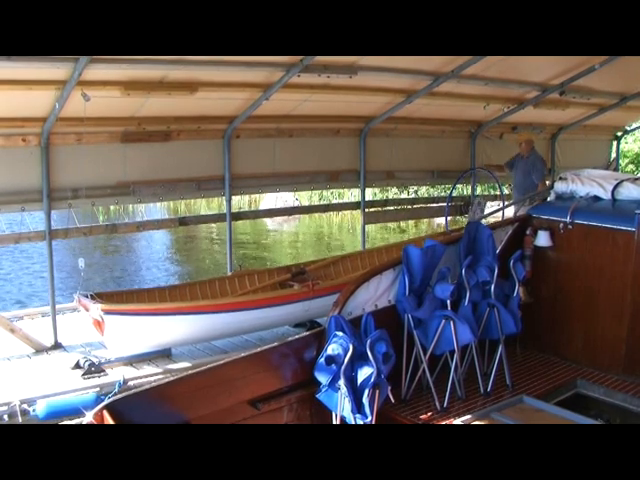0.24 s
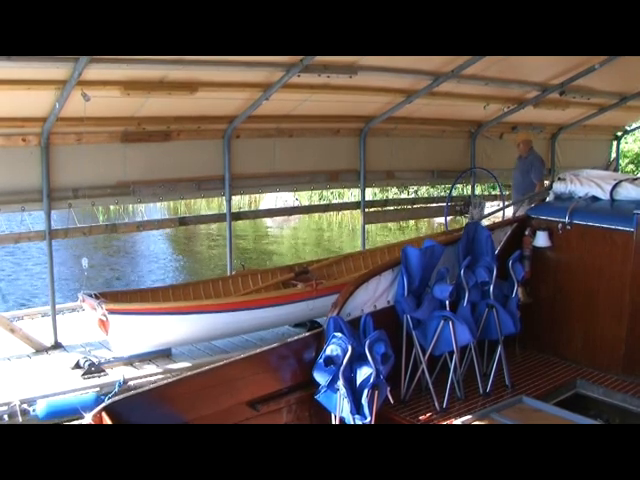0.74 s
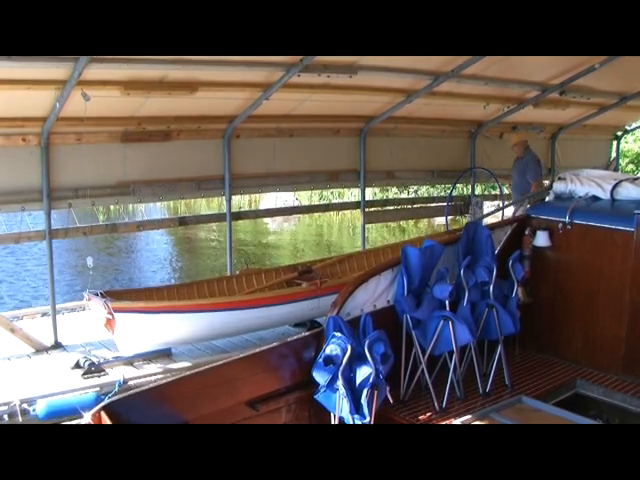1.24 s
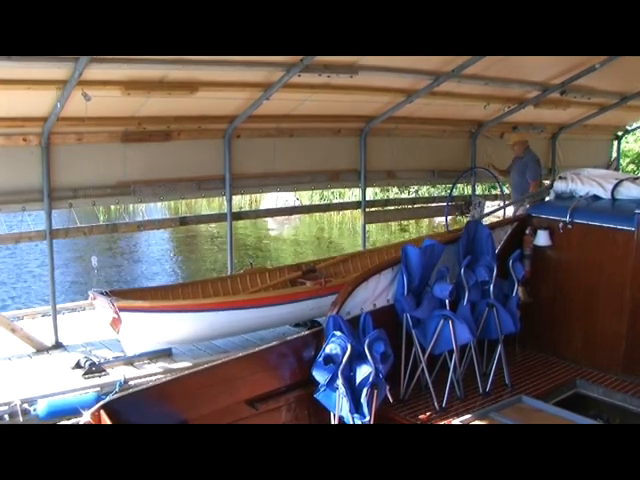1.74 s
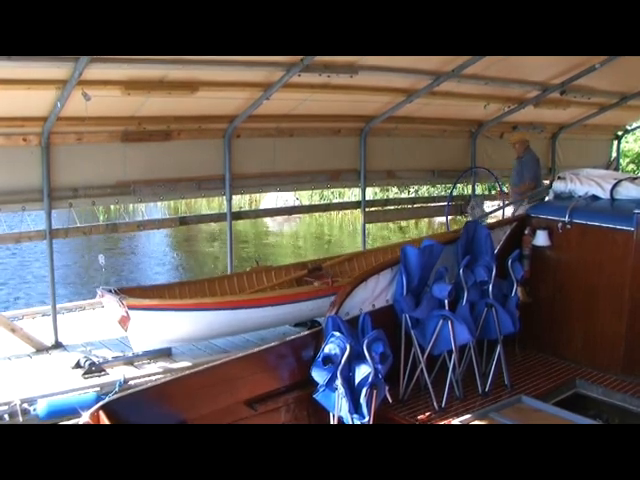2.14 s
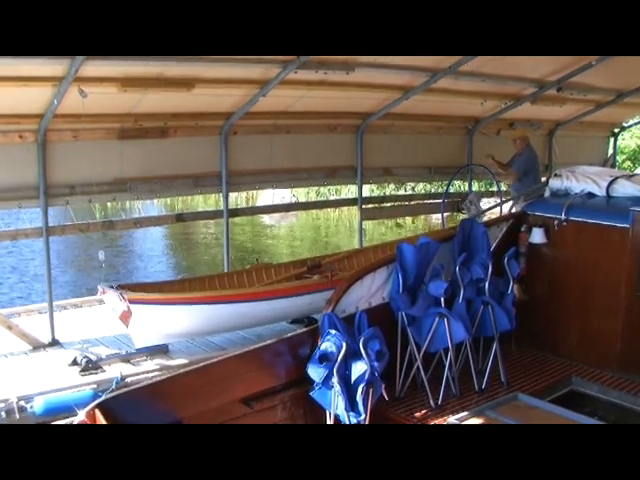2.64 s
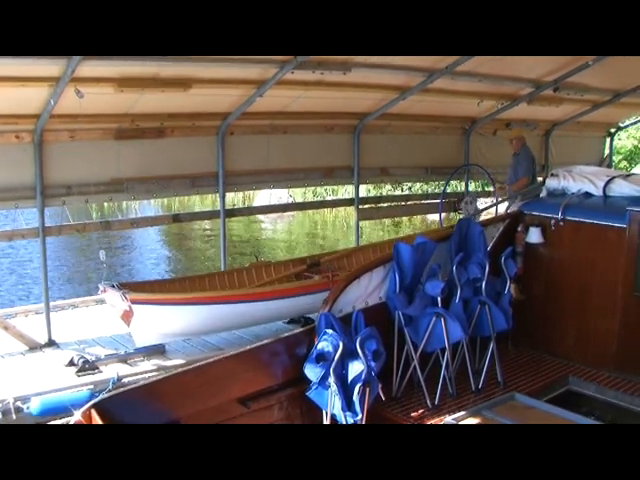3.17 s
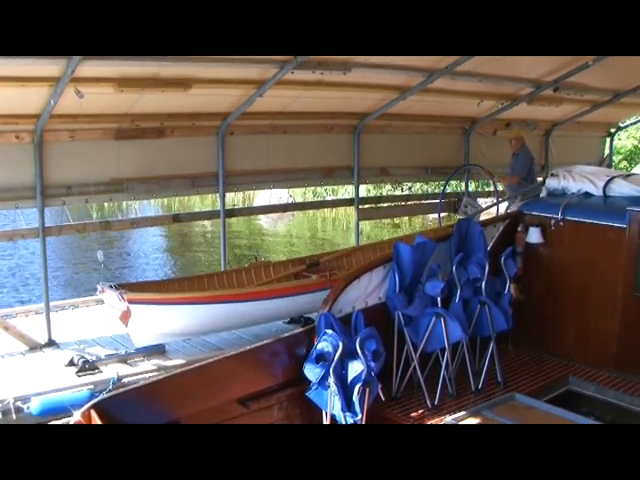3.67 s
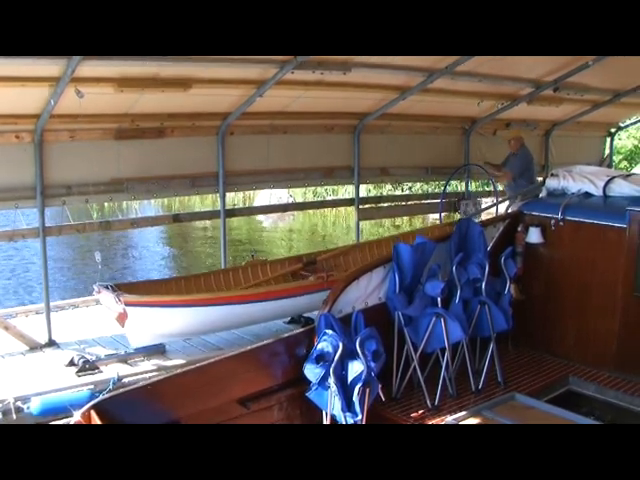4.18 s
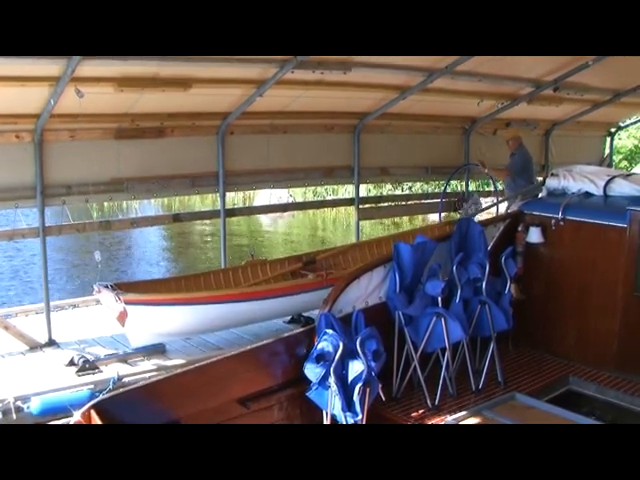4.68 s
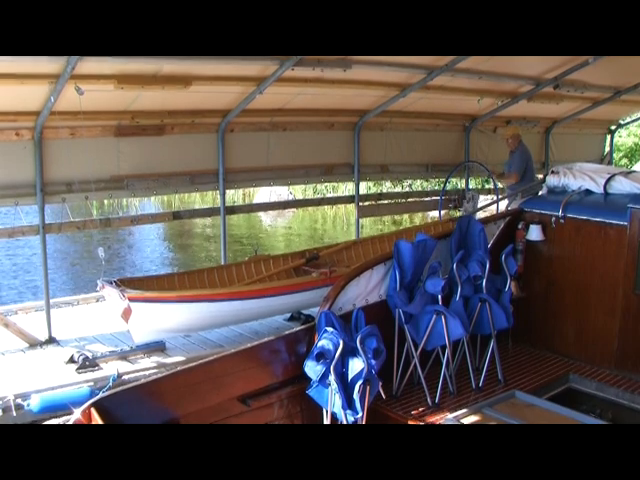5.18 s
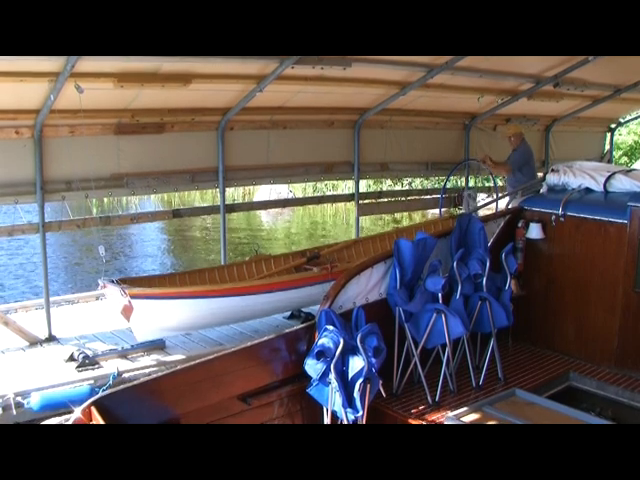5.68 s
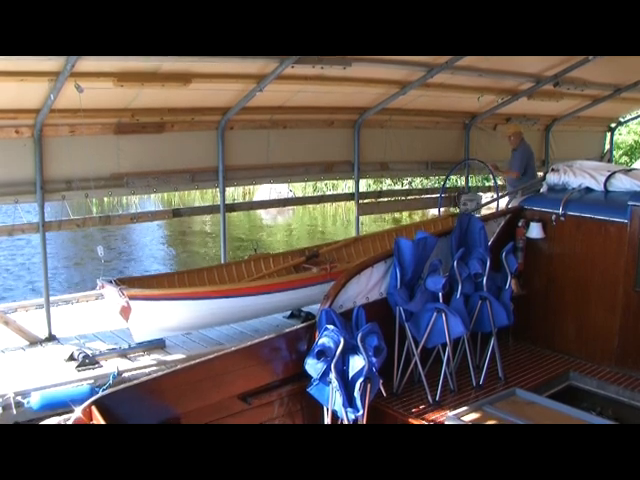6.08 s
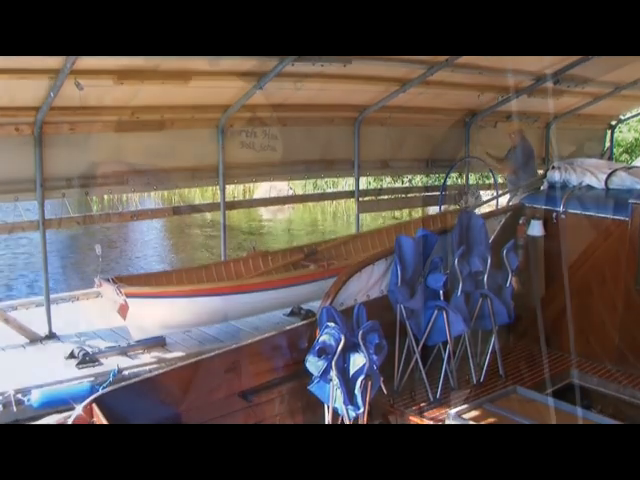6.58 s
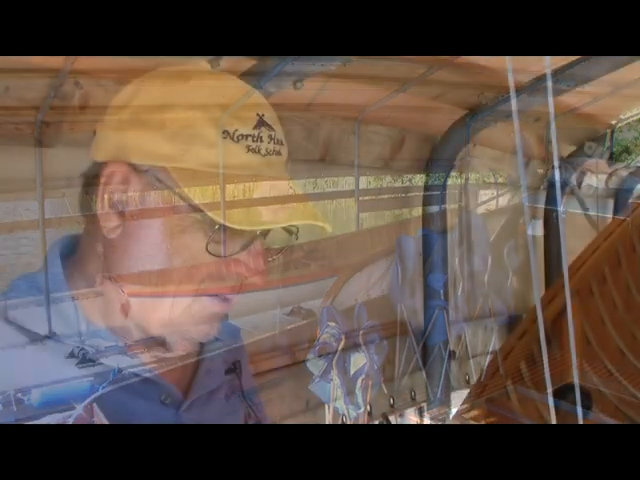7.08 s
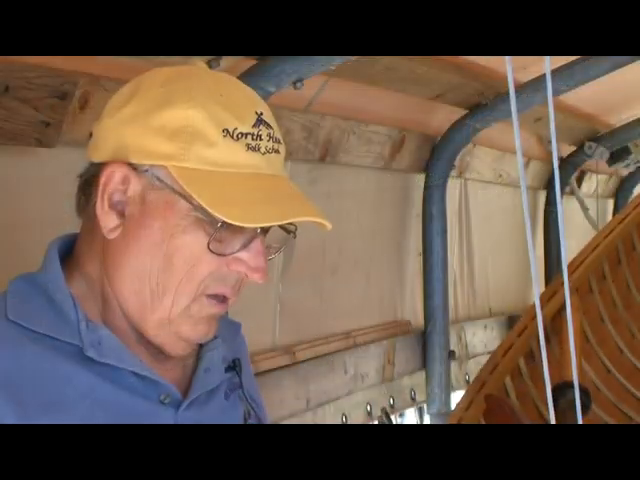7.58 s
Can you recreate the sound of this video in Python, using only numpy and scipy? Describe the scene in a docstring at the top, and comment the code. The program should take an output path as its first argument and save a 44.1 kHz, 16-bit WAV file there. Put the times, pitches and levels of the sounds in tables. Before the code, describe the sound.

A canvas-roofed boathouse by the water, with quiet open air, hollow dock slaps and a faint, wavering low motor far off. A ratchet winch stands a few metres away, slightly right. Steel pawl clanks sound at the very start and 0.05 s, then soft gear knocks around 0.7-1.35, with clustered water slaps from 0.4 to 1.45. A lone full clank rings at 1.5, followed by more knocks until 2.0. From 2.15 to 6.4 the wheel cranks steadily, spaced more widely around 3 s, then quickening to about ten clacks a second: tiny scrape, bright crack with a bounce, short clatter and metallic ring, each differing in pitch and force, softer in places. After it stops, gear knocks fall between 6.6 and 7.5; dry close ticks come at 6.95 and 7.55. The motor sinks, swells near 7.25 and fades. A soft rushing noise enters at 7.6 and continues to the end.

```python
"""In a canvas-roofed boathouse, a few metres from a boat lift, water laps at the dock and a distant motor hums unsteadily.
The big hand wheel starts with single drops of its steel pawl, and the gears knock softly in between.
Then a steady run: the pawl scrapes over each ratchet tooth and drops, ringing wheel and frame.
After the run come more gear knocks and two dry ticks close by; the motor sinks, swells briefly and sinks again.
Last a soft rushing noise joins the open air. Noise is coloured and shaped; the wheel is a bank of decaying modes."""
import sys
import numpy as np
from scipy import signal
from scipy.fft import rfft, irfft
from scipy.io import wavfile
from scipy.ndimage import uniform_filter1d

SR = 44100
rng = np.random.default_rng(int(sys.argv[2]) if len(sys.argv) > 2 else 0)


def unload_audio(sound):
    """Save the sound as a 16-bit wav file, at the path given as the first command line argument."""
    columns = np.transpose(np.atleast_2d(sound))
    # keep every value between -1 and 1, then stretch to whole-number steps
    steps = np.round(np.clip(columns, -1, 1) * 32767)
    wavfile.write(sys.argv[1], SR, steps.astype(np.int16))


N = 344862

# Stereo width of all noise and of the wheel. Each row: frequency in Hz, side relative to mid in dB.
STEREO_WIDTH = [(25, -12), (70, -2.5), (200, -7.5), (1000, -10.5), (2200, -11.5), (4500, -7), (9000, -4),
                (13000, -4)]
# Decay of the dense clatter under the roof. Each row: frequency in Hz, time to fall by 60 dB in seconds.
ROOF_DECAY = [(300, 0.28), (1000, 0.48), (2200, 0.36), (4000, 0.34), (6500, 0.25), (9000, 0.27),
              (14000, 0.16)]

# Open air outside, as heard over time. Each row: time in seconds, level in dB before the wandering.
AIR_LEVEL = [(0, -47.5), (.5, -48.5), (.8, -47.5), (2.2, -44.5), (4.2, -49.5), (4.8, -44.5), (5.4, -48),
             (6, -50.5), (6.6, -48.5), (7.3, -46), (7.6, -48.5), (7.82, -49.5)]
# Colour of the open air. Each row: frequency in Hz, relative level in dB.
AIR_SPECTRUM = [(15, -45), (25, -9.5), (116, -0.5), (309, 2), (372, -6), (436, 2), (525, -3.5), (632, 0.5),
                (1820, -8.5), (2380, -11), (3260, -16), (11600, -29), (12900, -48.5), (14000, -86.5)]
# Colour of the late rushing noise. Each row: frequency in Hz, relative level in dB.
RUSH_SPECTRUM = [(30, -10), (60, 0), (170, 3.5), (400, 1.5), (900, -5), (2000, -5.5), (3500, -13),
                 (4700, -11), (5600, -21), (12000, -25), (14000, -52)]

# Motor far across the water. Each row: time in seconds, level in dB before the flutter.
MOTOR_LEVEL = [(0.0, -54.5), (0.68, -49.5), (1.59, -54.5), (1.97, -49), (3.75, -57.5), (3.82, -52.5),
               (4.7, -59), (4.93, -54.5), (5.55, -64), (6.73, -69), (7.25, -57), (7.7, -64)]
MOTOR_HZ = 110.4

# Water slapping the dock. Each row: start in seconds, pitch in Hz, level in dB before the swell shapes it.
DOCK_SLAPS = [(.36, 620, -46.5), (0.612, 680, -44.5), (0.699, 605, -44), (.88, 650, -42), (.98, 544, -45),
              (1.09, 600, -44), (1.19, 630, -47), (1.449, 690, -46), (2.925, 280, -40), (7.342, 428, -47),
              (7.50, 950, -43.5)]

# Small dry ticks close by. Each row: start in seconds, level in dB before the decay.
DRY_TICKS = [(6.944, -39.5), (7.545, -33.5)]
# Colour of a tick. Each row: frequency in Hz, relative level in dB.
TICK_SPECTRUM = [(300, -14), (1500, 9), (3500, -2.5), (6000, -12.5), (12000, -30)]

# Soft gear knocks. Each row: start in seconds, level in dB relative to the other knocks.
GEAR_KNOCKS = [(0.6745, -32.5), (0.7735, -27), (0.971, -36), (1.1594, -39), (1.347, -40), (1.8112, -33.5),
               (1.8723, -35.5), (2.0066, -34), (6.6245, -37.5), (6.7335, -31.5), (7.1137, -31),
               (7.2581, -33.5), (7.367, -32), (7.5093, -41)]
# Colour of a knock. Each row: frequency in Hz, relative level in dB.
KNOCK_SPECTRUM = [(300, -0.5), (900, -2.5), (1600, -14.5), (2400, -8), (3000, -14.5), (3900, -9.5),
                  (4600, -14.5), (7000, -15), (9000, -27), (14000, -38)]
# Resonances of the gear housing. Each row: centre in Hz, width in Hz, peak height in dB.
HOUSING_PEAKS = [(1050, 33, 14.5), (1432, 53, 17), (1976, 50, 15.5), (2325, 100, 11.5), (2644, 38, 14),
                 (2926, 280, 12), (3630, 260, 10.5)]
KNOCK_HZ, KNOCK_SCATTER = 2480, 0.21  # mean pitch that a knock favours; its random spread as a share

# Pawl drops, the first just before the scene opens.
# Each row: start in seconds, level in dB relative to the other drops, pitch this tooth favours in Hz.
PAWL_DROPS = [(-.046, -6, 1030), (0.0522, -5, 2330), (1.5077, -5, 1290), (2.139, -5, 1100),
              (2.2372, -5, 1110), (2.3907, -4, 1330), (2.4927, -5.5, 2320), (2.6124, -9, 1520),
              (2.8064, -4.5, 2020), (2.982, -5, 2067), (3.1604, -5, 5770), (3.2956, -4.5, 2320),
              (3.4151, -6.5, 2025), (3.527, -7, 1656), (3.6262, -13, 2320), (3.8082, -14, 1012),
              (3.8742, -4, 894), (3.948, -4.5, 6700), (4.043, -6.5, 6480), (4.1522, -6, 2120),
              (4.2506, -6.5, 4270), (4.362, -8.5, 2274), (4.4788, -8.5, 2260), (4.574, -9.5, 2500),
              (4.6456, -6, 1274), (4.7159, -6.5, 1490), (4.8024, -11, 1263), (4.9108, -12.5, 1065),
              (5.029, -6, 997), (5.1249, -5, 2025), (5.245, -5, 2930), (5.3536, -4.5, 5400),
              (5.4461, -4.5, 2560), (5.5245, -7, 1117), (5.6077, -7.5, 1120), (5.6939, -9, 1122),
              (5.7836, -7, 1410), (5.8817, -7, 2115), (5.9776, -13, 1160), (6.0872, -10, 2076),
              (6.214, -15.5, 1109), (6.2844, -8.5, 1620), (6.384, -6, 3780)]
# Colour of the steel clank. Each row: frequency in Hz, relative level in dB.
CLANK_SPECTRUM = [(150, -48.5), (250, -37.5), (292, -15.5), (569, -18.5), (620, -12), (801, -12),
                  (1110, -8.5), (1820, -5.5), (2240, -1), (3270, -4), (3680, 0), (6590, 1.5), (8520, -10.5),
                  (11400, -6.5), (15000, -34.5)]
# Modes of wheel and frame. Each row: frequency in Hz, relative level in dB, time to fall by 60 dB in seconds.
WHEEL_MODES = [(630, -15, .7), (893, -12, .57), (996, -5, .52), (1098, -6, .65), (1222, -9, .59),
               (1266, -10, .9), (1325, -11, .9), (1440, -13, .8), (1620, -6, .42), (1798, -9, .7),
               (2023, -3, .62), (2102, -6, .55), (2160, -5, .62), (2320, -4, .72), (2509, -6, .39),
               (2595, -7, .72), (2756, -8, .6), (3106, -10, .8), (3429, -7, .62), (3650, -4, .38),
               (3801, -4, .33), (4221, -5, .38), (4768, -3, .33), (4890, -13, .62), (5297, -5, .38),
               (5770, -3, .31), (5920, -14, .55), (6467, -1, .34), (6655, -3, .3), (7075, -11, .42)]
# How well the spokes radiate. Each row: frequency in Hz, gain in dB.
SPOKE_RADIATION = [(700, -25), (1200, -29.5), (2300, -25), (4000, -20.5), (6500, -17.5)]
# How far a favoured wheel mode can stand out. Each row: frequency in Hz, boost in dB at a share of 1.
MODE_BOOST = [(1200, 11.5), (2400, 7), (5000, 3.5)]
# Groups of wheel modes; a drop favours one of each by chance. Each row: lowest Hz, highest Hz.
CHANCE_GROUPS = [(1950, 2900), (3300, 6900)]
OWN_SHARE, CHANCE_SHARE = 1.33, 0.45  # pull of the tooth's own pitch, and of the modes picked by chance

USUAL_DB = -6.5  # drop level in steady cranking
TOOTH_S, REST_S = 0.098, 1.0  # wait between drops in steady cranking; wait that counts as a full stop
SOFT_CLANG, SOFT_RING, SOFT_WHEEL = 0.72, 0.46, 0.2  # dB each part keeps per dB that a drop is softer
REST_CLANG_DB, REST_SIZZLE_DB, REST_WHEEL_DB = 1.5, 0.8, 0.5  # added per factor of e in the wait
WHEEL_DB, SIZZLE_DB = -1, 4.5  # for a drop of usual level in steady cranking
DAMP_DB = -2.5  # each new drop checks the ringing left by the ones before

TOP_HZ = 15000


def undb(db):
    """Decibels to gain."""
    return 10 ** (np.asarray(db) / 20)


def unit(x):
    """Scale to rms 1."""
    return x / np.sqrt(np.mean(x ** 2))


def read(points, hz):
    """Read (Hz, value) points on a log-frequency axis."""
    f, value = np.transpose(points)
    return np.interp(np.log(np.maximum(hz, 1)), np.log(f), value)


def curve(points):
    """Read (s, value) points at every sample."""
    return np.interp(np.arange(N) / SR, *np.transpose(points))


def bins(size):
    """Frequencies of a spectrum of this many samples."""
    return np.arange(size // 2 + 1) * SR / size


def colour(x, points):
    """Give a sound the spectrum of (Hz, dB) points."""
    size = x.shape[-1]
    return irfft(rfft(x) * undb(read(points, bins(size))), size)


def noise(size):
    """White stereo noise whose likeness left and right depends on frequency."""
    mid, side = rng.standard_normal((2, size))
    side = colour(side, STEREO_WIDTH)
    return np.array([mid + side, mid - side])


def walk(rate):
    """Smooth random wander with an rms of 1, from this many fresh values a second."""
    k = int(SR / rate)
    steps = np.repeat(rng.standard_normal(N // k + 1), k)
    smooth = uniform_filter1d(uniform_filter1d(steps, k), k)
    return unit(smooth[:N])


def add(out, s, sound):
    """Mix a sound in at a time, cutting what lies outside the scene."""
    start = int(round(s * SR))
    a, b = max(start, 0), min(start + sound.shape[-1], N)
    if b > a:
        out[:, a:b] += sound[:, a - start:b - start]


def swell(t, peak_s):
    """An envelope that rises from time 0 to 1 at its peak and dies away."""
    u = np.maximum(t, 0) / peak_s
    return u * np.exp(1 - u)


def bump(hz, centre_hz, width_hz):
    """A resonance peak of height 1."""
    return 1 / (1 + (2 * (hz - centre_hz) / width_hz) ** 2)


def patches(hz, width_hz=110, patchy_db=4):
    """Random clusters of the many small modes of a bolted frame, in dB."""
    count = int(SR / width_hz) + 2
    return patchy_db * np.interp(hz / width_hz, np.arange(count), rng.standard_normal(count))


def die_away(x):
    """Dense reflections under the roof: each band of a sound fades at its own rate."""
    size = x.shape[-1]
    hz, t60 = np.transpose(ROOF_DECAY)
    spectrum, t = rfft(x), np.arange(size) / SR
    out = 0
    # overlapping bands that add up to the whole sound
    for row, life in zip(np.eye(len(hz)), t60):
        share = read(np.c_[hz, row], bins(size))
        out = out + irfft(spectrum * share, size) * np.exp(-np.log(1000) * t / life)
    return out


def air(rush_db=-44.0, rush_s=7.62, rush_rise_s=0.018, lumpy_db=2.5):
    """Outdoor wash whose lows and highs wander apart; a soft rushing noise with lumpy lows joins at the end."""
    wash = unit(colour(noise(N), AIR_SPECTRUM))
    low = colour(wash, [(400, 8), (1200, -13)])
    wash = low * undb(.8 * walk(18)) + (wash - low) * undb(.5 * walk(7))
    rush = unit(colour(noise(N), RUSH_SPECTRUM))
    rush_low = colour(rush, [(400, 0), (2500, -10), (6000, -25)])
    rush = rush + rush_low * (undb(lumpy_db * walk(45)) - 1)
    rush = rush * np.clip((np.arange(N) / SR - rush_s) / rush_rise_s, 0, 1)
    left_right = undb([[.7], [-.7]])  # slightly stronger on the left
    return (wash * undb(curve(AIR_LEVEL)) + undb(rush_db) * rush) * left_right


def motor(waver=0.0059, flutter_db=0.8):
    """A low drone from across the water: one sine tone, slightly unsteady in pitch and level."""
    hz = MOTOR_HZ * (1 + waver * walk(4))
    hum = np.sqrt(2) * np.sin(2 * np.pi * np.cumsum(hz) / SR)  # rms 1
    level_db = curve(MOTOR_LEVEL) + flutter_db * walk(7.4)
    return hum * undb(level_db) * undb([[1], [-1]])  # slightly stronger on the left


def water(size=16384, swell_s=0.011, ripple_db=-56, count=24):
    """Hollow slaps under the dock: swelling noise around a pitch, with smaller ripples scattered throughout."""
    out, t = np.zeros((2, N)), np.arange(size) / SR
    # ripples at random times, from 300 to 900 Hz, up to 4 dB above the weakest
    ripples = [(u * N / SR, 300 * 3 ** v, ripple_db + 4 * w) for u, v, w in rng.random((count, 3))]
    for s, hz, db in DOCK_SLAPS + ripples:
        hollow = [(hz / 2, -20), (hz, 0), (hz * 2, -17), (hz * 10, -72)]
        slap = unit(colour(noise(size), hollow)) * swell(t, swell_s)
        add(out, s, undb(db) * slap)
    return out


def ticks(size=2048, decay_s=0.0033):
    """Tiny clicks close by: short bursts of noise that die at once, with no ring."""
    out, t = np.zeros((2, N)), np.arange(size) / SR
    for s, db in DRY_TICKS:
        tick = unit(colour(noise(size), TICK_SPECTRUM)) * np.exp(-t / decay_s)
        add(out, s, undb(db) * tick)
    return out


def gears(size=16384, knock_db=-11, rise_s=0.00038, contact_db=5, contact_s=0.067, favour_db=6, width_hz=700):
    """Knocks of the gear teeth taking up the load, heard through the resonances of their housing."""
    out, t, hz = np.zeros((2, N)), np.arange(size) / SR, bins(size)
    housing_db = sum(db * bump(hz, centre, width) for centre, width, db in HOUSING_PEAKS)
    # the contact itself stands out above the tail under the roof
    shape = np.clip(t / rise_s, 0, 1) * undb(contact_db * np.exp(-t / contact_s))
    for s, db in GEAR_KNOCKS:
        favoured_hz = KNOCK_HZ * (1 + KNOCK_SCATTER * rng.standard_normal())
        gain = undb(housing_db + favour_db * bump(hz, favoured_hz, width_hz) + patches(hz))
        burst = irfft(gain * rfft(noise(size)))
        knock = die_away(unit(colour(burst, KNOCK_SPECTRUM)))
        add(out, s, undb(db + knock_db) * knock * shape)
    return out


def drop_tint(db, wait_s):
    """Clang, ring, sizzle and wheel level of a drop in dB: a soft drop is duller, one after a pause is fuller."""
    soft = USUAL_DB - db
    rest = np.log(min(wait_s, REST_S) / TOOTH_S)
    clang = SOFT_CLANG * soft + REST_CLANG_DB * rest
    ring = SOFT_RING * soft
    sizzle = SIZZLE_DB + REST_SIZZLE_DB * rest
    wheel_db = WHEEL_DB + SOFT_WHEEL * soft + REST_WHEEL_DB * rest
    return (clang, ring, sizzle), wheel_db


def favourites(tooth_hz):
    """What a drop rings most, as (Hz, share): its tooth's own pitch, and by chance one wheel mode of each group."""
    picks = [(tooth_hz, OWN_SHARE)]
    for low, high in CHANCE_GROUPS:
        group = [hz for hz, _, _ in WHEEL_MODES if low < hz < high]
        picks.append((rng.choice(group), CHANCE_SHARE))
    return picks


def strike_db(hz, bands, favoured, favour_db=7, width_hz=55, width_share=0.01):
    """Colour of one drop in dB: every tooth meets the pawl at another place and favours other pitches."""
    clang, ring, sizzle = bands
    tint = read([(1200, clang), (2400, ring), (4000, 0.0028), (6500, 0.0036), (9500, sizzle)], hz)
    peaks = [share * bump(hz, f, width_hz + width_share * f) for f, share in favoured]
    return tint + favour_db * np.max(peaks, axis=0)


def wheel_ring(t, bands, favoured):
    """The wheel's modes come in close, beating pairs of decaying tones, freshly weighted by each drop."""
    hz, db, t60 = np.repeat(WHEEL_MODES, 2, axis=0).T
    size, drift, turn, spread = rng.standard_normal((4, len(hz)))
    db = db + read(SPOKE_RADIATION, hz) + strike_db(hz, bands, favoured, read(MODE_BOOST, hz))
    db = db + 3.5 * (size - 1)
    hz = hz * (1 + .003 * drift)
    rings = np.exp(np.outer(2j * np.pi * hz - np.log(1000) / t60, t))
    mid = undb(db) * np.exp(2j * np.pi * turn)
    side = mid * undb(read(STEREO_WIDTH, hz)) * np.exp(2j * np.pi * spread)
    return (np.array([mid + side, mid - side]) @ rings).imag


def pawl(size=24576, clatter_db=-9.5, crack_db=-7, scrape_db=-30.0, same=0.34, rise_s=0.00048,
         spread_s=0.0009, crack_s=0.0033, scrape_s=0.0088, bounce_s=0.015, bounce_db=-5):
    """Each tooth: a short scrape, the crack of the drop and one bounce, then dense clatter and the wheel's ring."""
    out, t, hz = np.zeros((2, N)), np.arange(size) / SR, bins(size)
    frame = noise(size)  # the part of the clatter that every tooth shares
    clank = unit(undb(read(CLANK_SPECTRUM, hz)))
    slide = int(scrape_s * SR)
    times = np.array(PAWL_DROPS)[:, 0]
    waits = [TOOTH_S, *np.diff(times)]
    for (s, db, tooth_hz), wait_s in zip(PAWL_DROPS, waits):
        bands, wheel_db = drop_tint(db, wait_s)
        favoured = favourites(tooth_hz)
        gain = clank * undb(strike_db(hz, bands, favoured) + patches(hz))
        source = np.sqrt(same) * frame + np.sqrt(1 - same) * noise(size)
        steel = irfft(gain * rfft(source))
        clatter = die_away(steel) * np.clip(t / rise_s, 0, 1)
        # the direct crack is bright; the pawl hops once and lands again
        crack = irfft(gain * rfft(noise(size)))
        crack = colour(crack, [(900, -10.5), (3000, -3.5), (7000, -1.5), (13000, -7)])
        hop_s = bounce_s * rng.uniform(.7, 1.3)
        crack = crack * (swell(t, crack_s) + undb(bounce_db) * swell(t - hop_s, crack_s))
        # the blow takes a moment to spread round the wheel
        ring = wheel_ring(t, bands, favoured) * (1 - np.exp(-t / spread_s))
        later_drops = np.searchsorted(times[times > s], s + t)
        ring = ring * undb(DAMP_DB * later_drops)
        drop = undb(clatter_db) * clatter + undb(crack_db) * crack + undb(wheel_db) * ring
        add(out, s, undb(db) * drop)
        # the scrape grows up to the moment of the drop
        scrape = steel[:, -slide:] * np.linspace(0, 1, slide)
        add(out, s - scrape_s, undb(scrape_db) * scrape)
    return out


def scene(right_db=0.44, lag_samples=0.39):
    """The winch stands a little to the right, so the left ear hears it later and softer."""
    left, right = pawl() + gears()
    left = irfft(rfft(left) * np.exp(-2j * np.pi * bins(N) * lag_samples / SR), N)
    winch = np.array([left * undb(-right_db), right * undb(right_db)])
    return air() + motor() + water() + ticks() + winch


def record(dry):
    """The microphone chain rounds off the highest peaks and cuts the top of the treble."""
    rounded = dry / (1 + np.abs(dry) ** 6) ** (1 / 6)
    return signal.sosfilt(signal.ellip(8, .2, 70, TOP_HZ, fs=SR, output="sos"), rounded)


dry = scene()
out = record(dry)
unload_audio(out)
```